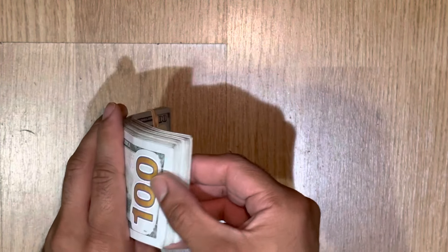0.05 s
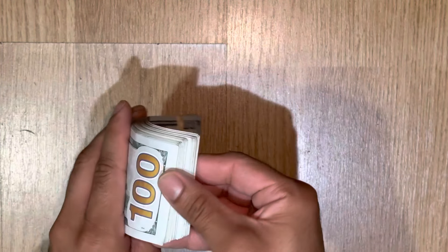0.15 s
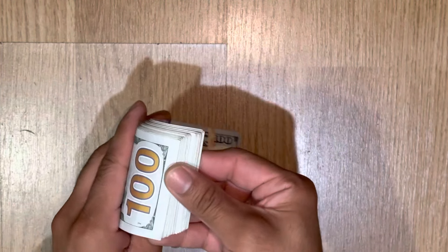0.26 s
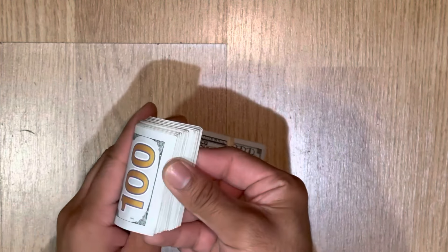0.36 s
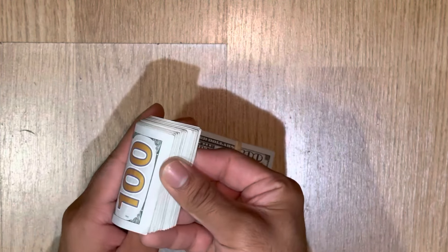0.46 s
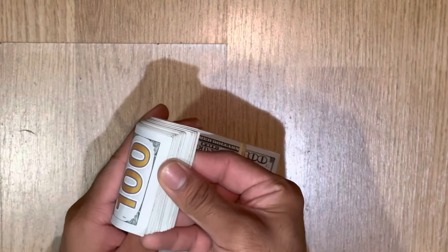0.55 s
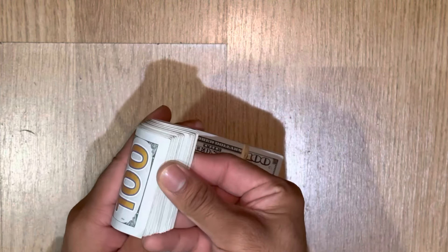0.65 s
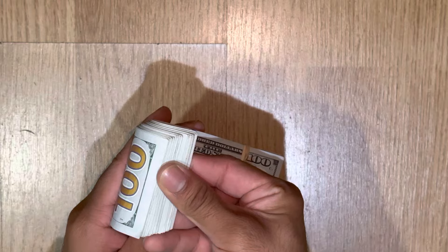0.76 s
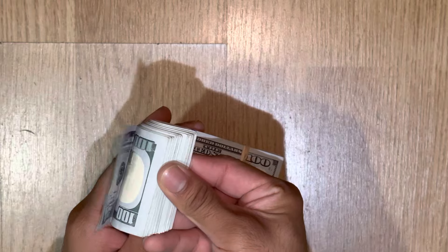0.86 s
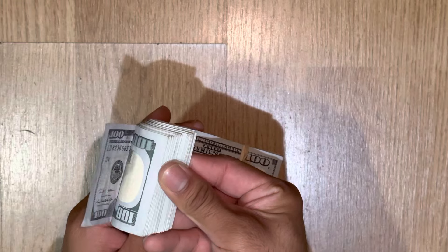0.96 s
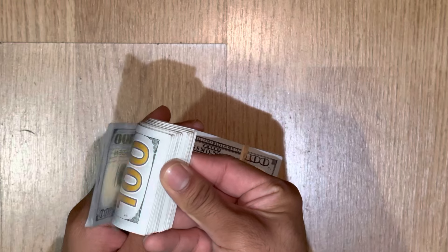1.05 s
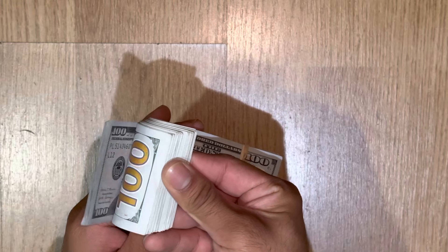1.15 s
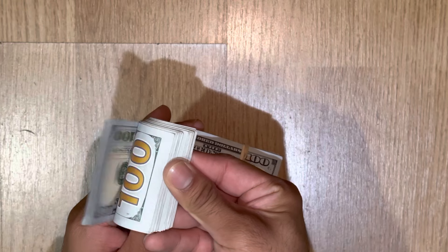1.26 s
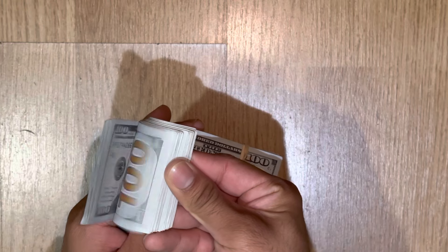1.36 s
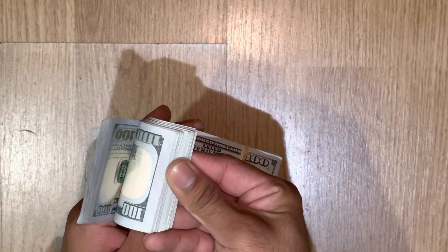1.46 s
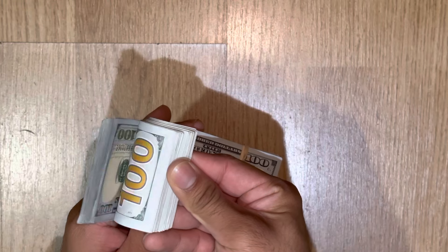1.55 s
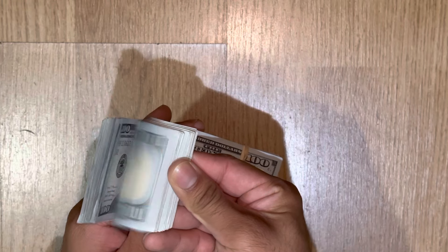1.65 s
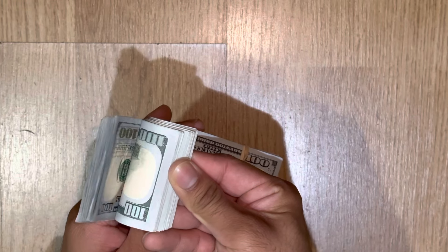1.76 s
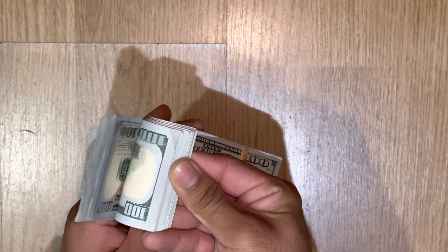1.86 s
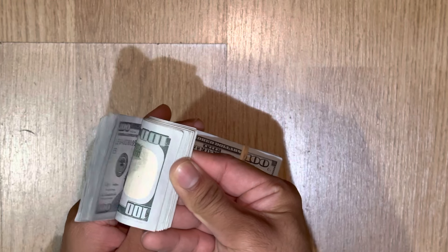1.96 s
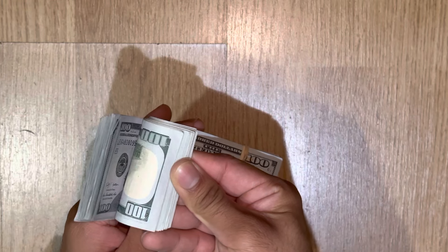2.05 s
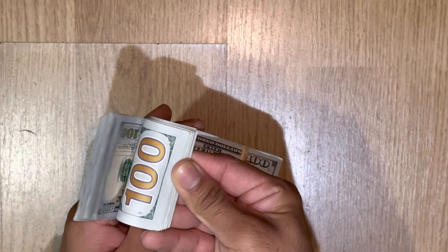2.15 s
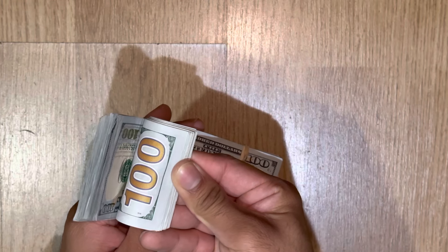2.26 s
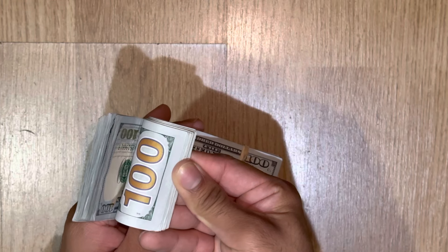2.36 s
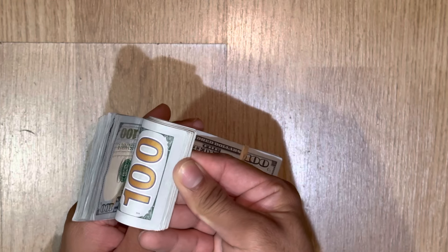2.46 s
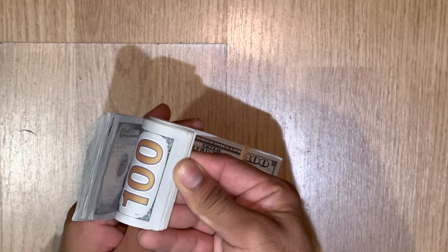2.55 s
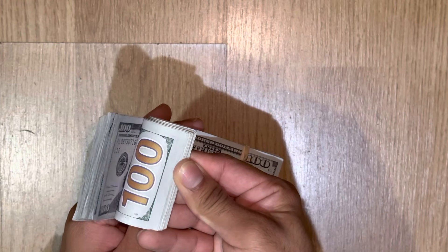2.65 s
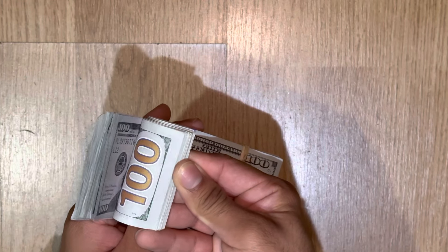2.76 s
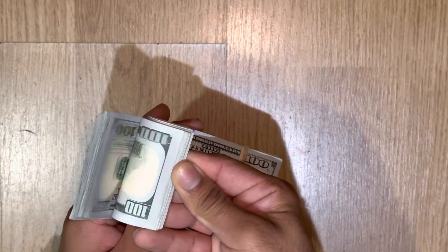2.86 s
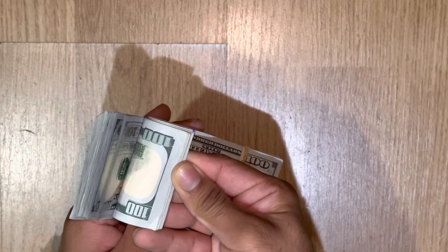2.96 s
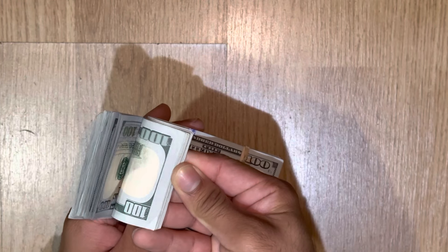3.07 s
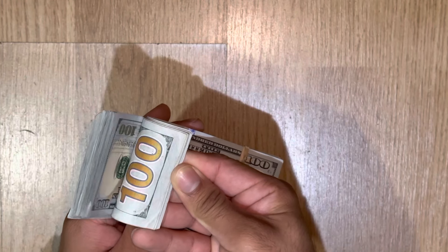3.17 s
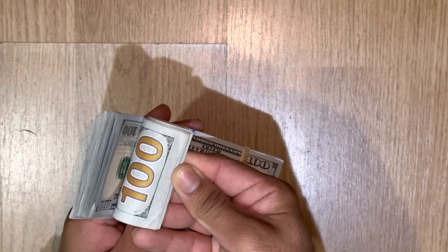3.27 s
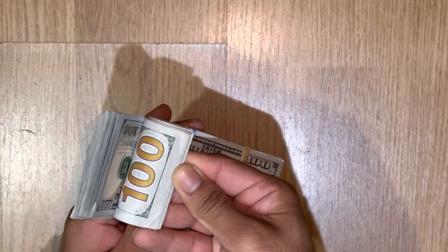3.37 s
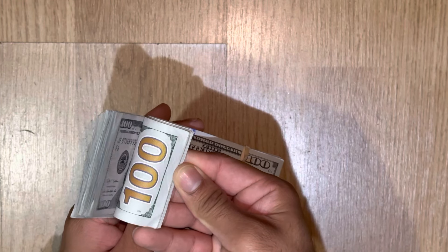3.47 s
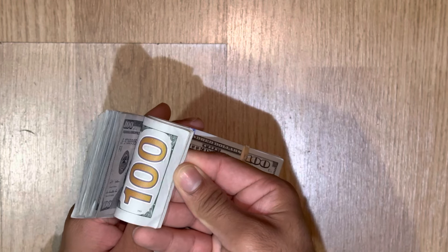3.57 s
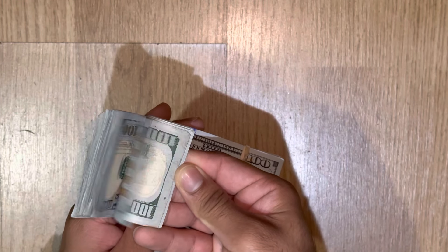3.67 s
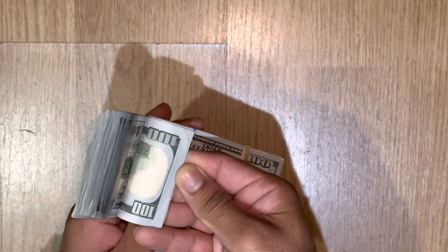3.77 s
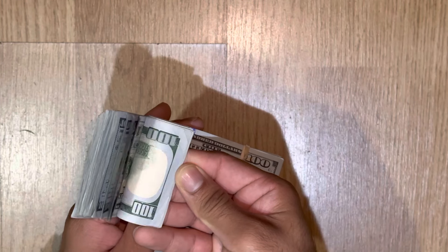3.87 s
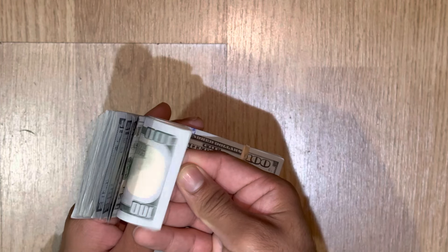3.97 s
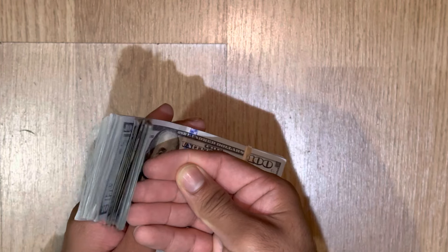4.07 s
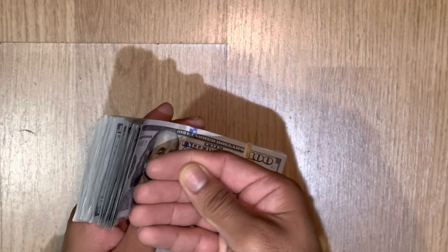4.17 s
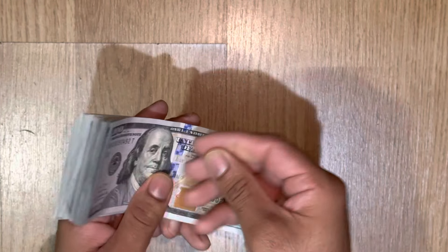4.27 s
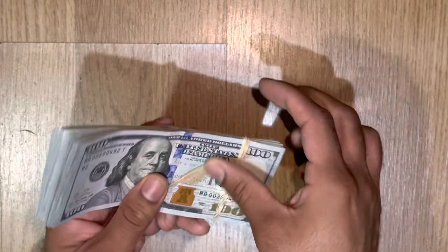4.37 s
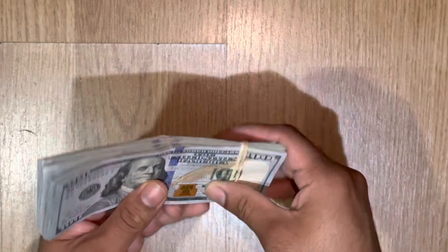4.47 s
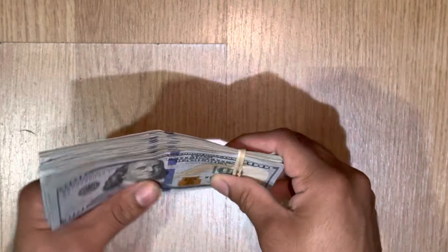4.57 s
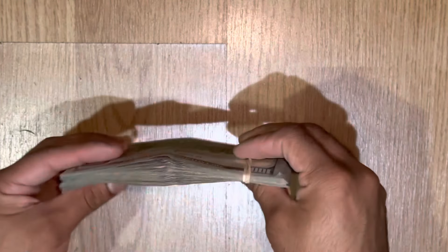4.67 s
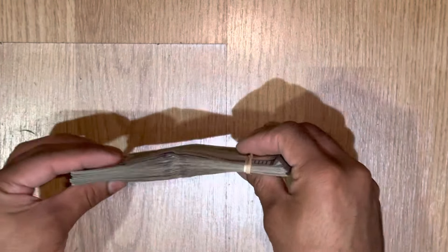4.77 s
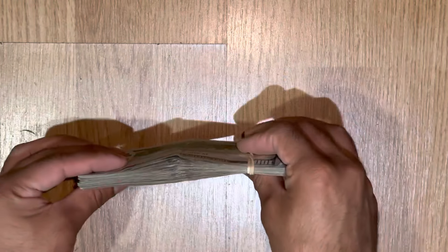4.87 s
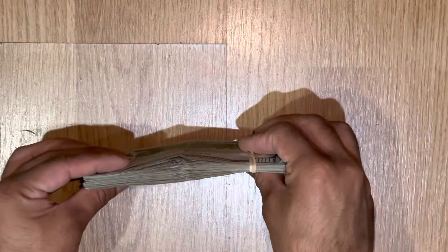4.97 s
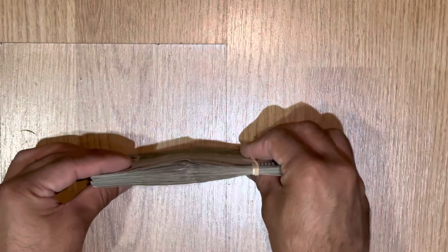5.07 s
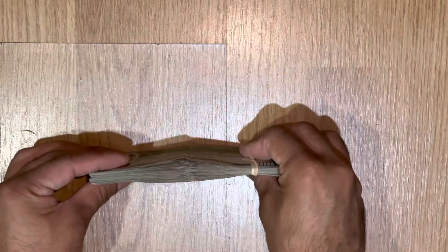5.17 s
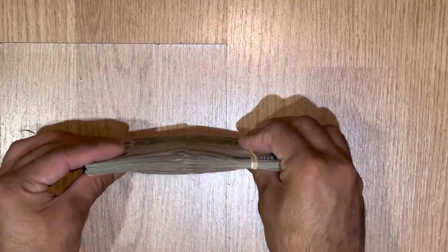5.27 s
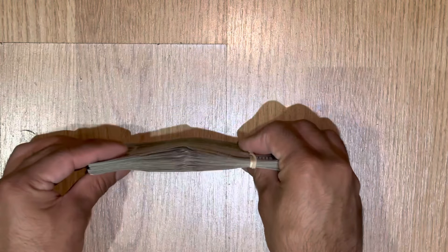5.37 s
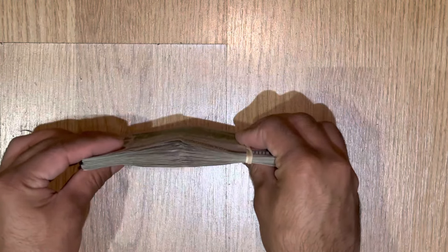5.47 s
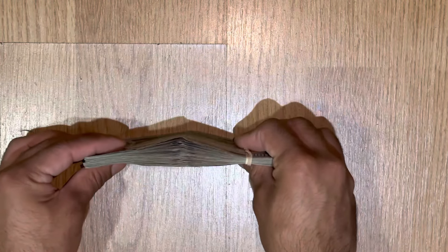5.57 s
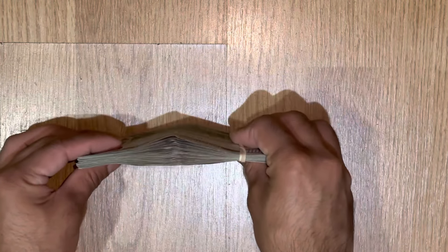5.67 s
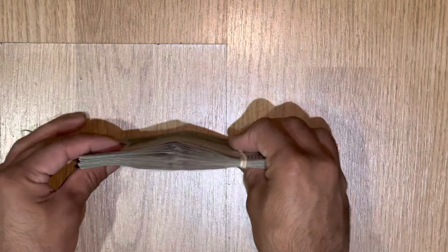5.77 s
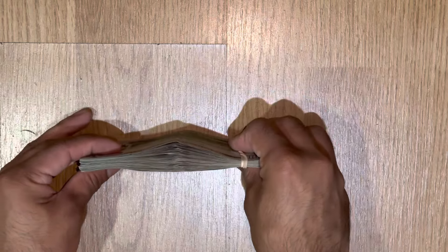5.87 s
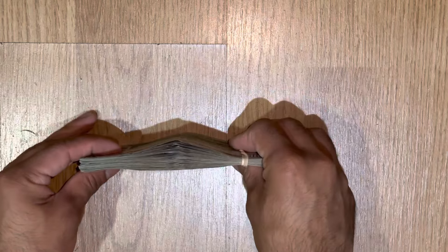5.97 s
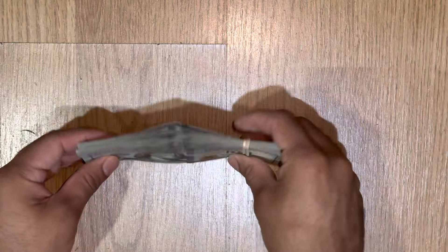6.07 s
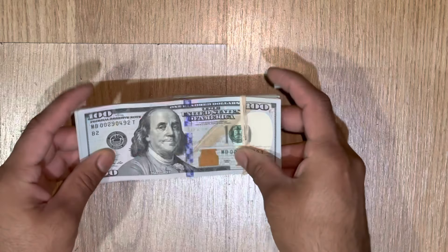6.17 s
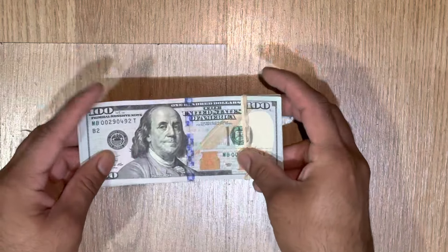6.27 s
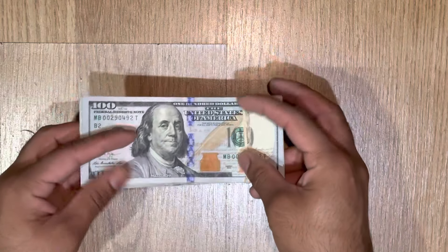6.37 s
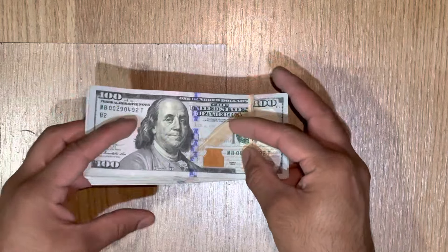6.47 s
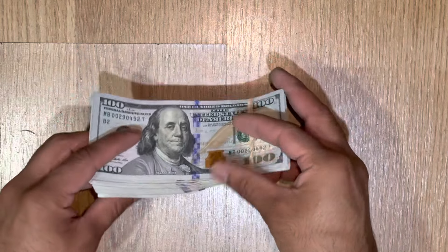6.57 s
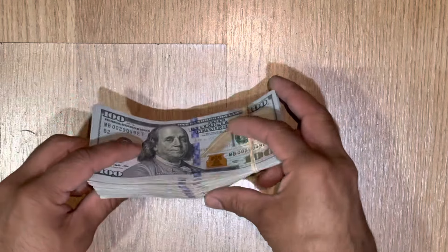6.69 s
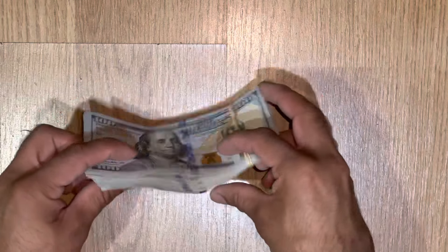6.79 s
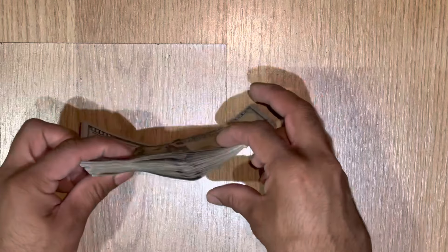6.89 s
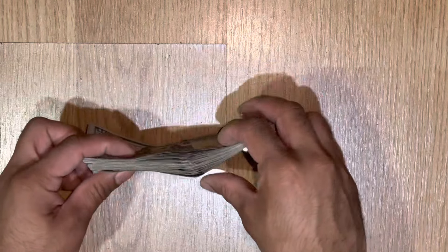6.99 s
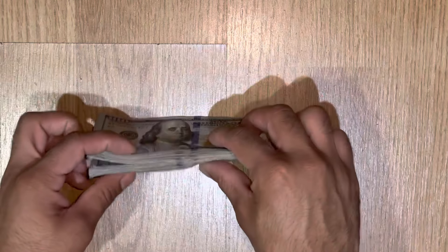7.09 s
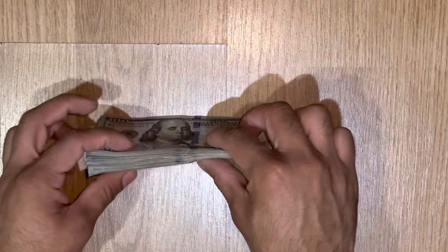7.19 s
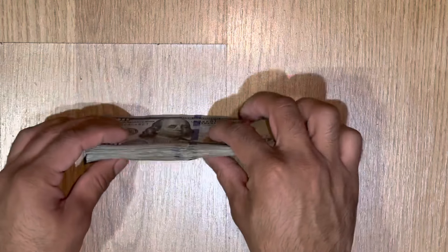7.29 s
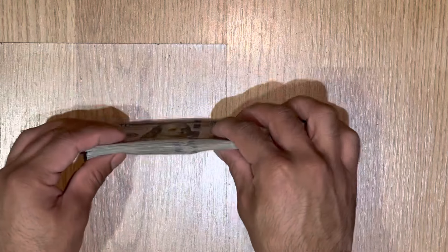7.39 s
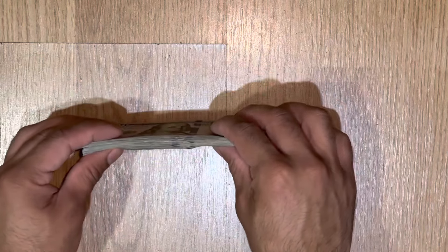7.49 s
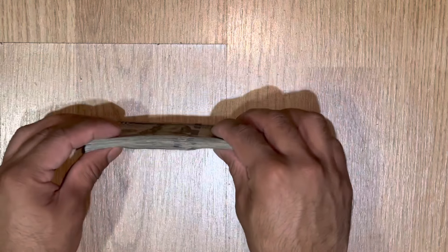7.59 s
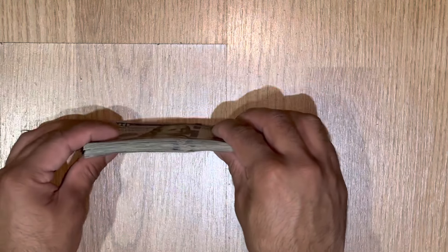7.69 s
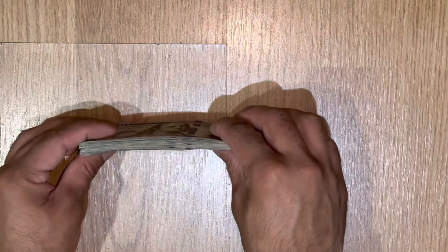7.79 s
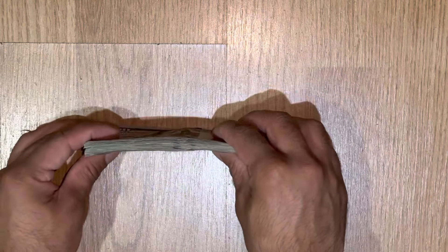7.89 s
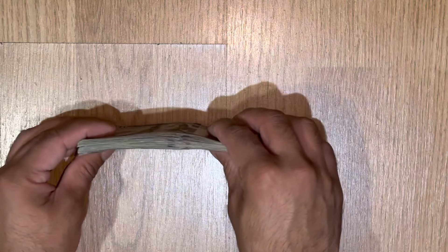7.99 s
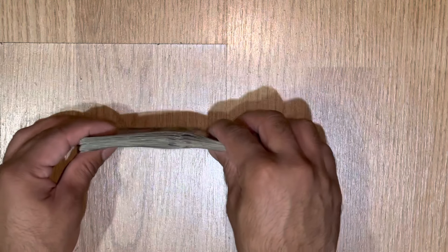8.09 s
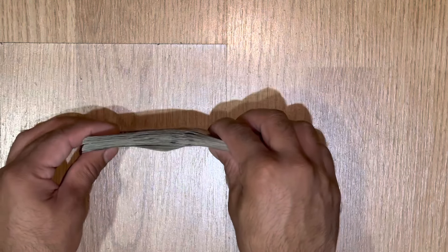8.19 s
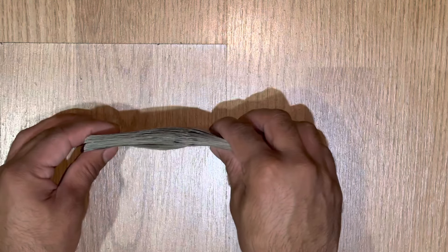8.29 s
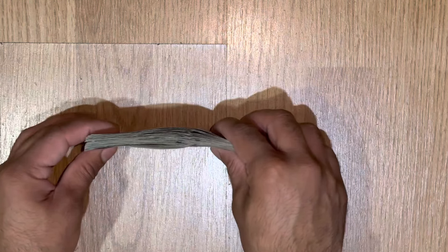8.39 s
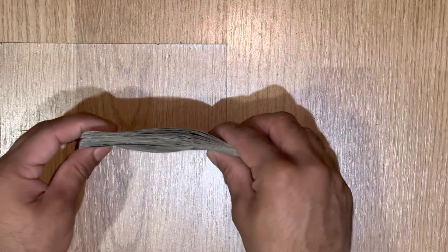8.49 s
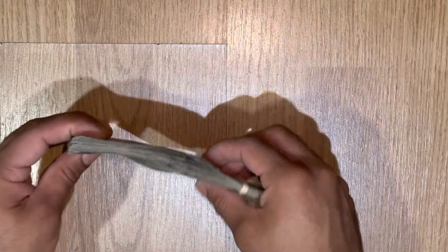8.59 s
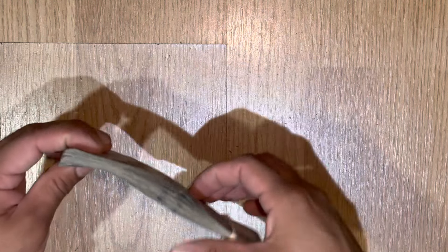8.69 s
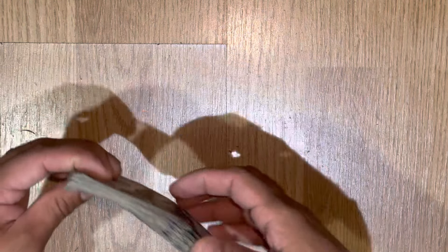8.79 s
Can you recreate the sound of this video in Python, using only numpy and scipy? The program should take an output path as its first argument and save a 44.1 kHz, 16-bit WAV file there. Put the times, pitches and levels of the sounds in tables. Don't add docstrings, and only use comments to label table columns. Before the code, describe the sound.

Very close in a quiet room, a thumb riffles a wad of paper notes: sharp, bright, millisecond cracks with tiny flutters, dense at first, then in ones and twos. A long papery slide follows, then four double taps of the wad on wooden boards, with low hollow booms. Soft rubbing and crackles lead to looser, slappier taps, then quiet. A faint appliance hum and low rumble lie beneath.

```python
import sys
import numpy as np
from scipy import signal
from scipy.fft import rfft, irfft, next_fast_len
from scipy.io import wavfile
from scipy.ndimage import uniform_filter1d

SR = 44100
rng = np.random.default_rng(int(sys.argv[2]) if len(sys.argv) > 2 else 0)


def to_wav(s):
    ch = np.atleast_2d(s).T
    pcm = np.round(np.clip(ch, -1, 1) * 32767)
    wavfile.write(sys.argv[1], SR, pcm.astype(np.int16))


def natural_amplitude(level_db):
    exponent = np.asarray(level_db, float) / 20
    return 10 ** exponent


N = 389844


def band(x, lo_hz, hi_hz, order=2):
    return signal.sosfilt(signal.butter(order, [lo_hz, hi_hz], "band", fs=SR, output="sos"), x)


def unit(x):
    return x / np.sqrt(np.mean(x ** 2))


def top(x):
    return x / np.abs(x).max()


def on_hz(table, hz):
    f, v = np.transpose(table)
    return np.interp(np.log(hz + 1), np.log(f + 1), v)


def colour(x, table):
    size = next_fast_len(x.shape[-1])
    gain = natural_amplitude(on_hz(table, np.fft.rfftfreq(size, 1 / SR)))
    return irfft(rfft(x, size) * gain, size)[..., :x.shape[-1]]


def walk(rate_hz):
    hold = int(SR / rate_hz)
    steps = np.repeat(rng.standard_normal(N // hold + 1), hold)
    return unit(uniform_filter1d(steps, hold)[:N])


def add(out, s, x):
    i = int(s * SR)
    out[i:i + len(x)] += x[:len(out) - i]


def ring(modes, detune, size):
    t = np.arange(size) / SR
    out = np.zeros(size)
    for (hz, db, t60_s), d in zip(modes, detune):
        out += natural_amplitude(db) * np.sin(2 * np.pi * hz * d * t) * np.exp(-np.log(1000) * t / t60_s)
    return out


# (time [s], peak level [dB], sheet resonance [Hz], its ring [dB], edge crack [dB])
FLICKS = [(0.0458, -48, 6580, -13, -12), (0.0705, -43, 3580, -6, -10), (0.806, -39, 6900, 9, -3.5),
          (1.0164, -37, 7900, -4, 7.5), (1.0678, -35, 7100, -2, 5.5), (1.1493, -36.5, 6250, -4, -3),
          (1.203, -35.5, 4970, 5, 4.5), (1.261, -30, 7100, -23, -4.5), (1.3563, -36, 6710, -15, 5),
          (1.3753, -35.5, 4960, -9, -1), (1.4151, -39, 6060, -17, 8), (1.44, -32.5, 5570, -2, -20),
          (1.4967, -33, 5010, -1, 3), (1.5457, -37, 4400, 10, 5), (1.5835, -27.5, 6140, -26, -12),
          (1.664, -35.5, 6730, -15, -2), (1.6772, -24.5, 6000, 5, 4), (1.8181, -33, 7860, -8, 7.5),
          (1.8327, -29, 6800, -13, 6), (1.8906, -36, 7400, 0, 10), (1.956, -30, 7200, 2, 0),
          (2.1268, -26.5, 5740, -2.5, -1)]
SINGLES = [(2.5591, -34.5, 3980, -7, 1.5), (2.7831, -39, 7300, -2, 7.5), (2.8542, -45, 6400, -2, 5),
           (2.8877, -37, 3900, 10, 12), (3.1018, -29, 7500, -23, -4), (3.1563, -30, 6190, 7, 3),
           (3.4535, -40, 6740, -20, 1), (3.6272, -39.5, 6660, -2, 3), (3.646, -33, 4700, 6, -11),
           (3.6571, -26, 7200, -2, -9), (3.6776, -30, 4040, 2, -6), (3.7507, -23, 7000, 0, -9),
           (3.9472, -56, 3920, -4, -12), (3.9968, -39, 6450, 3, 6), (4.0091, -30.5, 7100, -11, 0),
           (4.2936, -69, 3760, -2, -13), (4.3266, -43, 5800, -4, -2), (4.4952, -40, 6200, -9, -3)]
# (time [s], peak level [dB], sheet resonance [Hz])
CRACKLES = [(6.1536, -50, 3620), (6.1923, -44, 2930), (6.51, -54, 2800), (6.5719, -47, 2900),
            (6.655, -52, 2800), (6.7121, -60, 7400), (6.8102, -37, 3530), (6.8458, -41, 5240),
            (7.1192, -34, 3890), (7.3888, -43, 4140), (8.22, -50, 3500), (8.6444, -56, 3500)]
CRACKLE_RING_DB, CRACKLE_EDGE_DB, CRACKLE_FLAP_DB = -7, -10, 0
FLAP_DB, FLAP_FOLLOWS = -52, .25


def flicks(rise_s=0.00061, fall_s=0.00086, creep_s=0.005, creep_db=-15.0, flutter_s=0.0086, flutter_db=-20.5,
           rustle_s=0.024, rustle_db=-19.0):
    out = np.zeros(N)
    t = np.arange(9000) / SR - .012
    events = [(*e, FLAP_DB + FLAP_FOLLOWS * (e[1] + 35) - e[1]) for e in FLICKS + SINGLES]
    events += [(*e, CRACKLE_RING_DB, CRACKLE_EDGE_DB, CRACKLE_FLAP_DB) for e in CRACKLES]
    for s, db, hz, ring_db, edge_db, flap_db in events:
        n = rng.standard_normal(len(t))
        before = np.exp(-np.abs(t) / rise_s) + natural_amplitude(creep_db) * np.exp(-np.abs(t) / creep_s)
        after = np.exp(-t / fall_s) + natural_amplitude(flutter_db) * np.exp(-t / flutter_s)
        shape = np.where(t < 0, before, after)
        shape = shape + (t > 0) * natural_amplitude(rustle_db) * np.exp(-t / rustle_s)
        sheet = unit(band(n, 2460, 12460)) + natural_amplitude(ring_db) * unit(band(n, hz * .95, hz * 1.05, order=1))
        edge = band(n, 7500, 12500) - natural_amplitude(-3.) * band(n, 14000, 16500) * np.exp(-np.abs(t) / .05)
        flap = band(shape * np.exp(-np.abs(t) / 0.031) * n, 800, 3500)
        crack = top(shape * sheet) - natural_amplitude(edge_db) * top(shape * edge) + natural_amplitude(flap_db) * top(flap)
        add(out, max(s - .0105, 0), natural_amplitude(db) * crack)
    return out


# (time [s], peak level [dB], thud [dB], clack [dB], paper slap [dB])
NUDGES = [
    (0.827, -63, 2, -27, -11),
    (2.89, -67, 9.5, 9, 15),
    (4.004, -63.5, 7.5, -10, 14.5),
    (4.294, -61.5, -2, 11, -4),
    (4.329, -43, -9, -8, -7),
]
TAPS = [(5.097, -38, -13, -6, -12.5), (5.111, -36, 2.5, -15, -16), (5.342, -39, -6, 5, -7),
        (5.362, -34, -10, 5, -9), (5.561, -29, -3.5, -6, -4.5), (5.575, -40, 2, 10, -5),
        (5.761, -26.5, 1, -15, -15.5), (5.77, -21.5, -5, -15.5, -19.5), (6.84, -55.5, -2.5, 6, 3.5),
        (7.02, -54.5, -6, -20, -9), (7.107, -39.5, -14, -24, -15), (7.335, -45, -21, -13, -9.5)]
LOOSE_TAPS = [
    (7.62, -30, 0, -8, -9),
    (7.87, -39, -8, 2, -6.5),
    (7.88, -30, 3, -11, -11),
    (8.116, -36, -7, -4, -13),
    (8.127, -25, 1, -10, -15),
    (8.306, -43, -3, -16, -34),
]
TIGHT_SLAP_DB, LOOSE_SLAP_DB = -9, 5
# (frequency [Hz], level [dB], t60 [s])
BOARDS = [(141.5, -10, 0.073), (215, -2, 0.08), (277.5, 5, 0.07), (320, -4, 0.065), (425, -18, 0.027),
          (518.7, 1, 0.079), (582, -1.5, 0.072), (656, -14.5, 0.059), (713, -2.5, 0.02),
          (913, -13.5, 0.026), (940, 2, 0.04), (1190, -8, 0.12), (1507, -19, 0.016)]


def taps(late_s=0.00499, land_s=0.00083, push_s=0.0041, dull_s=.013, dull_db=2.5, slap_s=0.016,
         settle_s=0.087, settle_db=-6.5):
    out, t = np.zeros(N), np.arange(12000) / SR
    hits = [(*e, TIGHT_SLAP_DB) for e in NUDGES + TAPS] + [(*e, LOOSE_SLAP_DB) for e in LOOSE_TAPS]
    for s, db, low_db, high_db, slap_db, bright_db in hits:
        n = rng.standard_normal(len(t))
        landing = 1 - np.exp(-t / land_s)
        push = (n * landing * np.exp(-t / push_s))[:1500]
        modes = ring(BOARDS, 1 + 0.026 * n[-len(BOARDS):], len(t))
        wood = top(signal.fftconvolve(modes, push)[:len(t)])
        wood = wood + natural_amplitude(dull_db) * top(band(n[::-1] * landing * np.exp(-t / dull_s), 127, 1090, order=1))
        thud = np.roll(band(wood, 150, 300), int(late_s * SR))
        clack = band(wood, 1200, 2770)
        wood = top(band(wood, 400, 780)) - natural_amplitude(low_db) * top(thud) - natural_amplitude(high_db) * top(clack)
        bright = unit(band(n, 5500, 15100)) * np.exp(-t / 0.06)
        slap = unit(band(n, 1600, 6730)) - natural_amplitude(bright_db) * bright
        slap = slap * landing * (np.exp(-t / slap_s) + natural_amplitude(settle_db) * np.exp(-t / settle_s))
        add(out, s, natural_amplitude(db) * (wood + natural_amplitude(slap_db - 6.0) * slap))
    return out


# (time [s], level [dB])
BOOMS = [
    (5.109, -38.5),
    (5.359, -35.5),
    (5.57, -31.5),
    (5.769, -34.5),
    (6.83, -45.5),
    (7.101, -44),
    (7.618, -35),
    (7.881, -44.5),
    (8.125, -36.5),
]
# (frequency [Hz], level [dB], t60 [s])
TABLE_LOWS = [(64.4, 2.5, 0.46), (76, 2, 0.22), (134, -13.5, 0.5)]


def booms(swell_s=0.042):
    out, t = np.zeros(N), np.arange(22000) / SR
    boom = (1 - np.exp(-t / swell_s)) * ring(TABLE_LOWS, np.ones(len(TABLE_LOWS)), len(t))
    for s, db in BOOMS:
        add(out, s, natural_amplitude(db) * boom)
    return out


# (time of firmest touch [s], level [dB], time to swell 20 dB [s], time to fade 20 dB [s], treble [dB])
SLIPS = [
    (0.815, -59, .025, .09, 9),
    (2.56, -57.5, .01, .05, 1),
    (2.784, -59, .02, .07, 7),
    (2.854, -52, .01, .025, -3),
    (3.458, -55, .025, .025, 3),
    (3.628, -52, .01, .12, -3),
    (4.005, -49, .016, .03, 6),
    (4.05, -62, .05, .09, 6),
    (4.67, -53, .28, .14, 11),
]
RUBS = [(0.068, -63, .05, .05, -8), (0.22, -76, .15, .15, -12), (2.54, -77, .06, .03, -8),
        (3.43, -74, .05, .03, -8), (3.97, -74, .05, .03, -8), (4.25, -76, .1, .05, 2),
        (4.344, -62, .03, .25, 10), (4.53, -67, .12, .15, 2), (5.92, -64, .08, .06, 4),
        (6.11, -70, .03, .1, -6), (6.2, -59, .14, .08, 0), (6.36, -77, .1, .1, 4),
        (6.425, -71, .05, .04, 5), (6.61, -67, .03, .1, 3), (6.75, -71, .1, .1, 0),
        (6.835, -54, .12, .09, 3), (7.115, -51.5, .09, .08, 0), (7.29, -68, .07, .065, -14),
        (7.398, -58, .04, .08, -6), (7.72, -68, .1, .06, 4), (7.96, -66, .1, .07, 8),
        (8.105, -68, .02, .03, 2), (8.5, -74, .04, .2, -3), (8.66, -70, .02, .3, -8),
        (8.84, -70, .2, .1, -4)]
SLIP_DULL_DB, RUB_DULL_DB = -21, -8
SHINE_STEEP = 1.8


def slide(grain_db=2.2, flicker_db=1.5):
    t, out = np.arange(N) / SR, np.zeros(N)
    catch = natural_amplitude(grain_db * np.minimum(rng.exponential(size=N // 60 + 1), 4))
    catch = uniform_filter1d(np.repeat(catch, 60)[:N], 40)
    grains = rng.standard_normal(N) * catch * natural_amplitude(flicker_db * walk(30))
    dull = unit(band(grains, 417, 2600, order=1))
    mid = unit(band(grains, 2000, 9700, order=1))
    bright = unit(band(grains, 7400, 19845))
    touches = [(*e, SLIP_DULL_DB) for e in SLIPS] + [(*e, RUB_DULL_DB) for e in RUBS]
    for s, db, swell_s, fade_s, shine_db, dull_db in touches:
        below_db = 20 * np.where(t < s, (s - t) / swell_s, (t - s) / fade_s)
        shine = natural_amplitude(shine_db - (SHINE_STEEP - 1) * below_db) * bright
        out += natural_amplitude(db - below_db) * (mid + natural_amplitude(dull_db) * dull - shine)
    return out


# (frequency [Hz], t60 [s])
ECHO_T60 = [(150, 0.52), (600, 0.36), (2000, 0.48), (6000, 0.36), (11000, 0.22), (16000, 0.2)]


def room(x, gap_s=0.002):
    t = np.arange(20000) / SR
    tail = np.zeros((2, len(t)))
    for hz in 125 * 2. ** np.arange(0, 7.5, .5):
        n = rng.standard_normal((2, len(t))) * (1 - np.exp(-t / gap_s))
        tail += band(n, hz / 2 ** 0.27, hz * 2 ** 0.27) * np.exp(-np.log(1000) * t / on_hz(ECHO_T60, hz))
    return signal.fftconvolve(x[None], tail / np.sqrt(np.sum(tail[0] ** 2)), axes=1)[:, :N]


# (time [s], level [dB])
RUMBLE = [(0.0, -66), (0.4, -76), (0.7, -63), (1.5, -60), (2.1, -61), (2.3, -85), (2.6, -70), (3.3, -68),
          (4.0, -72), (4.5, -71), (4.75, -90), (5.2, -62), (5.9, -62), (6.3, -72), (6.7, -72), (7.0, -60),
          (7.4, -74), (8.84, -66)]
RUMBLE_MOST_DB = -57
# (frequency [Hz], level [dB rms])
HUM = [(59.5, -76.5), (242, -87.5), (479.5, -81), (1767, -90.5), (2166, -84), (4340, -95)]
# (frequency [Hz], density [dB per Hz])
AIR = [(25, -4.5), (80, -8.5), (210, -20.5), (400, -21), (700, -28), (1100, -33), (1700, -24), (2150, -24),
       (3000, -33.5), (5000, -39)]
# (frequency [Hz], density [dB per Hz])
MIC_HISS = [(8000, -43), (12000, -47.5), (13800, -45.5), (14500, -98.5)]
AIR_DB = -68


def background():
    t, (s, db) = np.arange(N) / SR, np.transpose(RUMBLE)
    air = unit(colour(rng.standard_normal((2, N)), AIR + MIC_HISS)) * natural_amplitude(AIR_DB + 1.1 * walk(4))
    rumble_db = np.minimum(np.interp(t, s, db), RUMBLE_MOST_DB) + 2.1 * walk(8)
    rumble = unit(band(rng.standard_normal((2, N)), 37, 64, order=3)) * natural_amplitude(rumble_db)
    hum = np.zeros(N)
    for hz, line_db in HUM:
        hum += natural_amplitude(line_db + 4 + 0.69 * walk(3.4)) * np.sin(2 * np.pi * hz * t + .4 * walk(2.2))
    return air + rumble + hum * np.array([[1], [0]])


# (frequency [Hz], level [dB])
APART = [(60, -15), (200, -5.5), (800, -5), (1500, -5), (2500, -73), (7000, -15), (8400, -24)]


def scene():
    crisp, knock = flicks(), taps()
    echo = room(natural_amplitude(-8.5) * crisp + natural_amplitude(-10.0) * band(knock, 67, 6400, order=1))
    common, twin = echo + background()
    common = common + crisp + knock + booms() + slide()
    side = colour(twin, APART)
    return np.array([common + side, common - side])


def top_cut(x):
    return signal.sosfilt(signal.butter(12, 16990, fs=SR, output="sos"), x)


# (frequency [Hz], lead of the left [rad])
TURN = [(20, 0), (2000, 0), (3270, -.5), (4800, 0), (7490, 0), (7840, -.6), (8350, -3.14), (9470, -3.14),
        (10400, -.6), (11000, 0), (11600, .2), (12900, 2.9), (13700, 3.2), (15400, 6.28)]
# (frequency [Hz], level [dB])
LEAN = [(60, -.7), (150, -1.6), (600, -1), (2000, -.1)]
# (frequency [Hz], level [dB])
MIC = [(25, -2), (50, 3), (12000, -2), (14500, -1), (16000, -5.5)]
TOP_HZ = 16000


def record(dry):
    size = next_fast_len(N)
    hz = np.fft.rfftfreq(size, 1 / SR)
    turn, lean_db, mic_db = (on_hz(table, hz) for table in (TURN, LEAN, MIC))
    outputs = np.exp(.5j * np.array([turn, -turn])) * natural_amplitude(mic_db + np.array([lean_db, -lean_db]) / 2)
    x = irfft(rfft(dry, size) * outputs, size)[:, :N]
    x = signal.sosfilt(signal.ellip(8, .5, 50, TOP_HZ, fs=SR, output="sos"), x)
    return top_cut(x)


dry = scene()
out = record(dry)
to_wav(out)
```